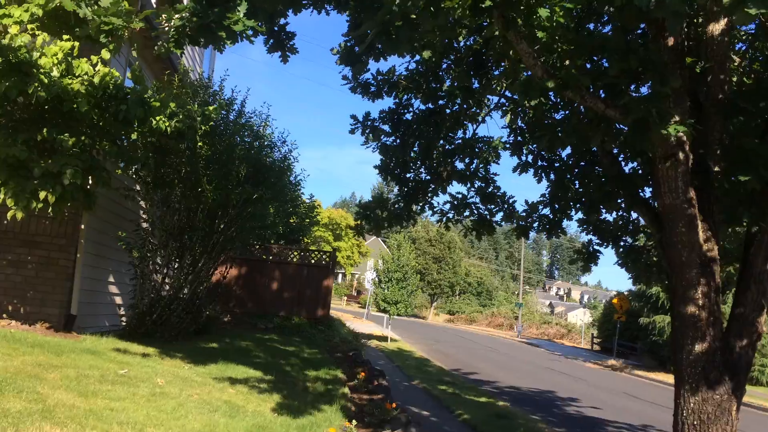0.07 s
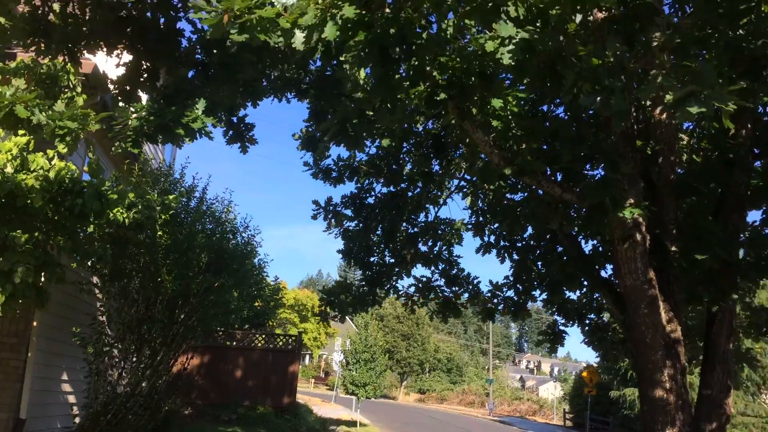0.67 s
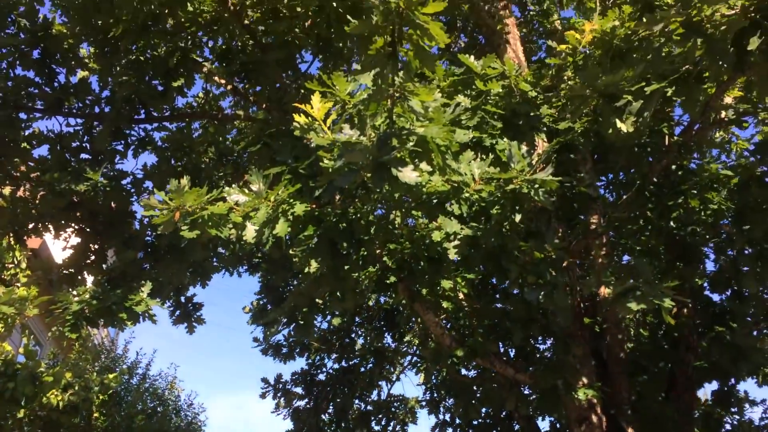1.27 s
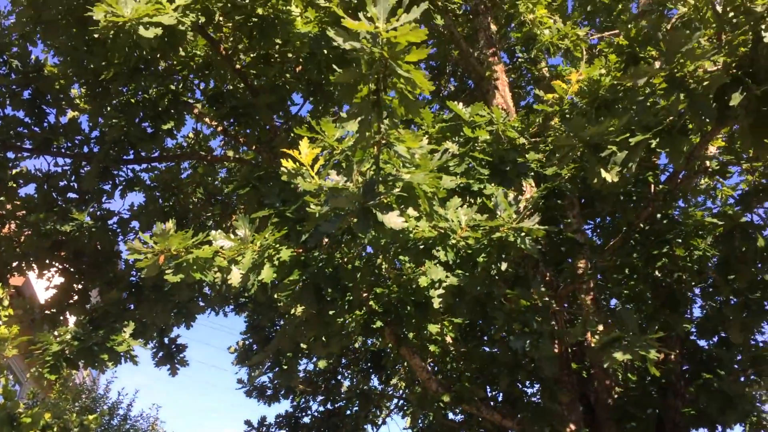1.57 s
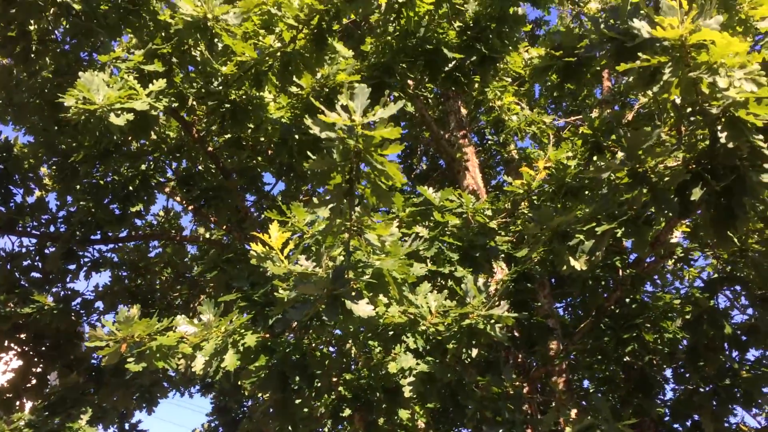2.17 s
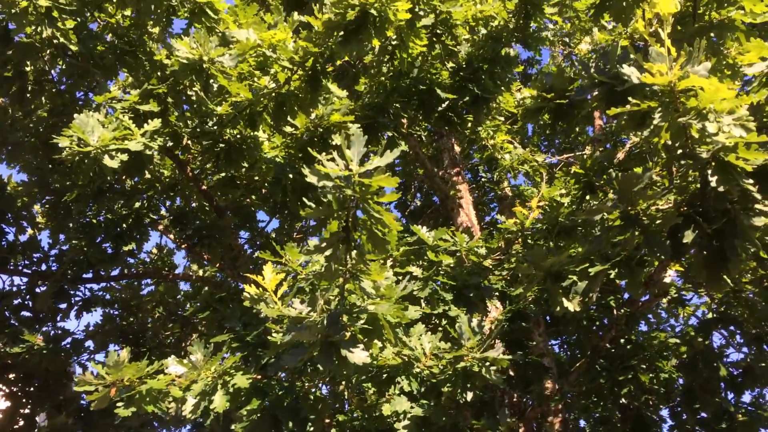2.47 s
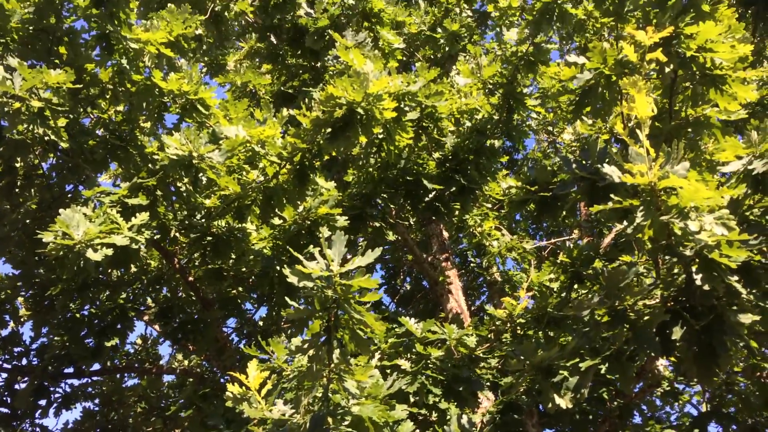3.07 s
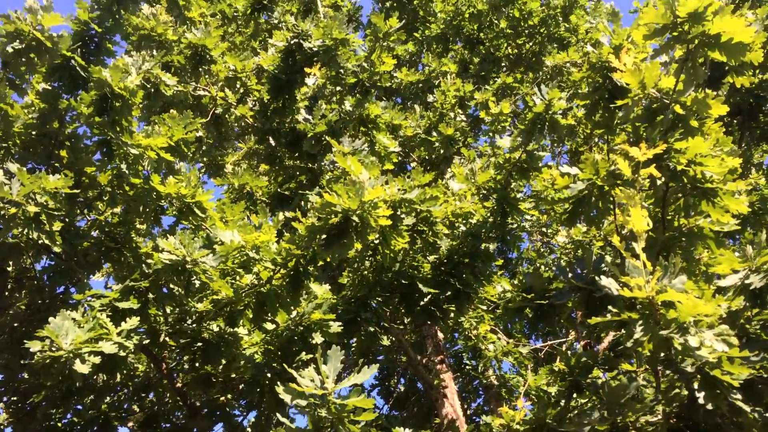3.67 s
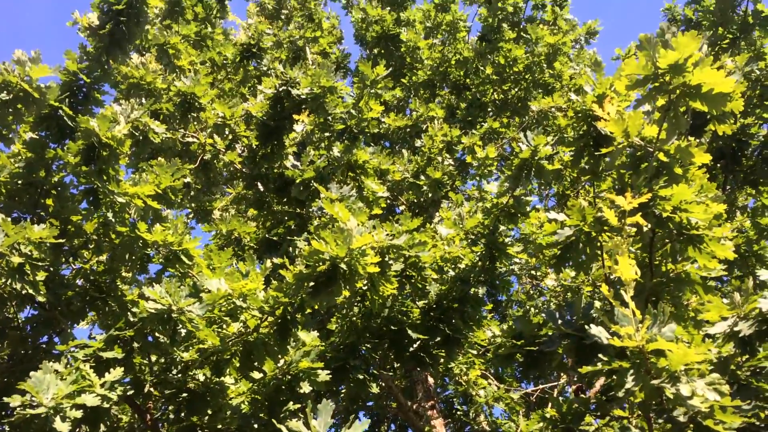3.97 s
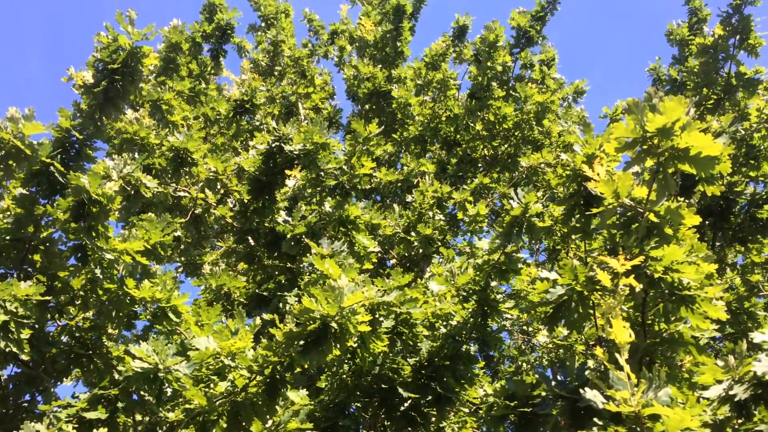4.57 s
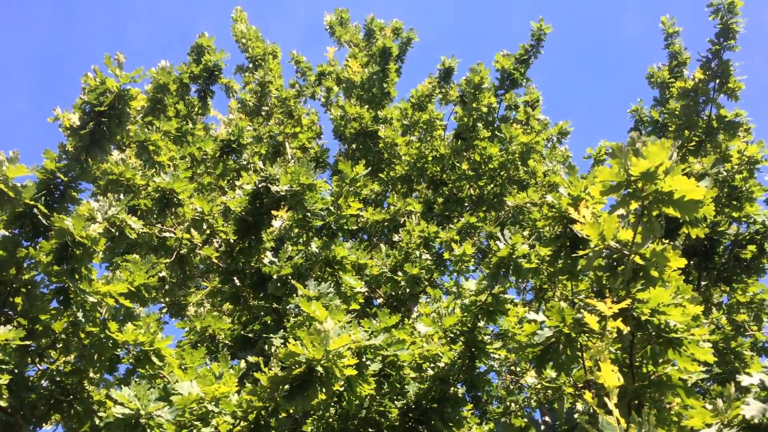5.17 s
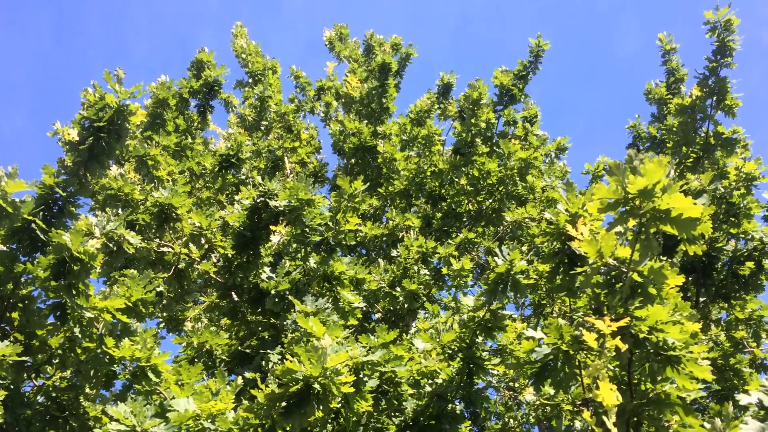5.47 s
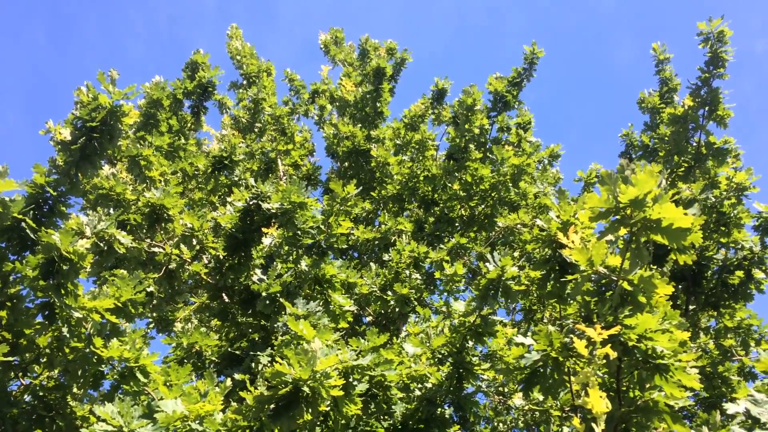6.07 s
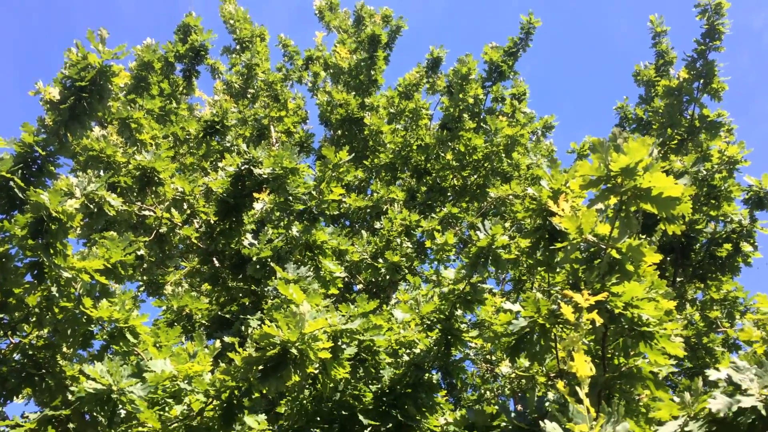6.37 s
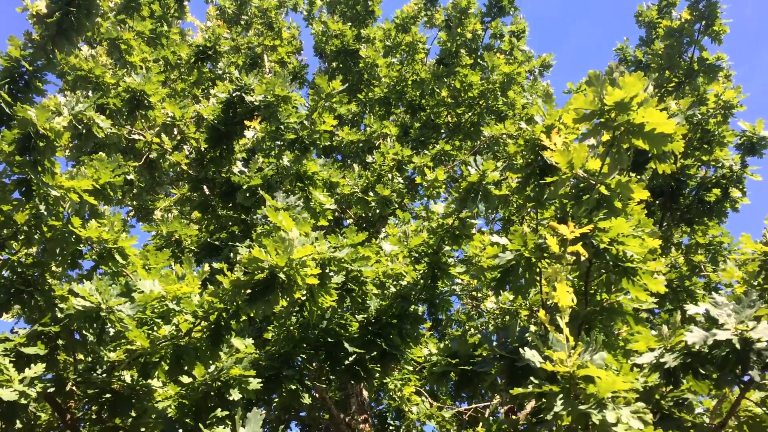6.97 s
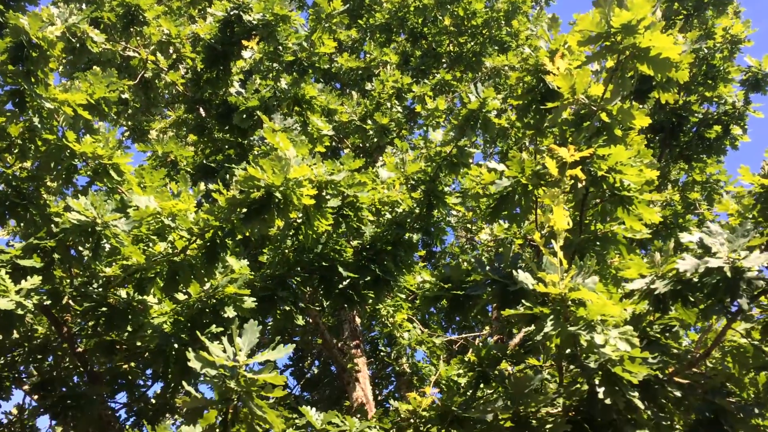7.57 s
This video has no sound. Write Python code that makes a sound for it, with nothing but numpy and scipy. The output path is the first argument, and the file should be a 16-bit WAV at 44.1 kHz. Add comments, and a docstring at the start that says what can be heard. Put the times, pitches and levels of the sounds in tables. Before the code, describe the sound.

A soft, steady hum of many bees fills a tree overhead throughout, over an uneven low rumble and faint outdoor hiss. Light brushes and a tick touch the hand-held microphone at about 1.3 to 1.4 seconds. Distant small birds give faint falling chirps and three high pips between 1 and 2.5 seconds, then a very faint high trill. From about 3.5 to 5.7 seconds one bird whistles a short phrased song with a light echo, clearest at 5 seconds. Two bees pass slightly closer at around 4.4 and 5.1 seconds. Sharp, bassy microphone pops come at 5.3, 6.2 and 6.8 seconds, the last the loudest and with a brief crackle. A thin, faint whine wavers above the hum from about 6 seconds until near the end. Another soft handling brush comes at 7.5 seconds as the bees carry on.

```python
"""A steady hum of bees fills the crown of an oak on a quiet street: many wingbeats merging into one.
Two bees pass closer, and a thin whine wanders above them. Small birds whistle some way off,
echoing from leaves and house fronts, over a low rumble and faint hiss. The hand-held microphone
picks up a few brushes and ticks, and three sharp pops, with a brief crackle around the last."""
import sys
import numpy as np
from scipy import signal
from scipy.fft import rfft, irfft, next_fast_len
from scipy.io import wavfile

SR = 44100
rng = np.random.default_rng(int(sys.argv[2]) if len(sys.argv) > 2 else 0)


def waveform_to_disk(signal):
    """Save audio, clipped to [-1, 1], as 16-bit WAV at the path in sys.argv[1]."""
    frames = np.transpose(np.atleast_2d(signal))
    scaled = np.clip(frames, -1, 1) * 32767
    samples = np.round(scaled).astype(np.int16)
    wavfile.write(sys.argv[1], SR, samples)


N = 344421
TIME = np.arange(N) / SR


def from_db(db):
    """Decibels to gain."""
    return 10 ** (np.asarray(db) / 20)


def rms_one(x):
    """Scale to unit power."""
    return x / np.sqrt(np.mean(x ** 2) + 1e-20)


def in_time(rows):
    """Automation: join breakpoints (time_s, values...) into one curve per value."""
    times, *columns = np.transpose(rows)
    return [np.interp(TIME, times, column) for column in columns]


def coloured(x, points):
    """Zero-phase EQ through (freq_hz, gain_db) points."""
    hz, db = np.transpose(points)
    size = next_fast_len(N + SR // 4)
    log_hz = np.log(np.fft.rfftfreq(size, 1 / SR) + 1e-3)
    gain = from_db(np.interp(log_hz, np.log(hz), db))
    return irfft(rfft(x, size) * gain, size)[:N]


def drift(rate_hz, size=N):
    """Smooth random modulation of spread 1, spanning the scene in size points."""
    control_hz = 500
    pole = np.exp(-2 * np.pi * rate_hz / control_hz)
    slow = signal.lfilter([1], [1, -2 * pole, pole * pole], rng.standard_normal(6000))[2000:]
    return np.interp(np.linspace(0, N / SR * control_hz, size), np.arange(len(slow)), rms_one(slow))


def phase_of(hz):
    """Running phase of a moving pitch."""
    return 2 * np.pi * np.cumsum(hz) / SR


def during(start_s, length_s):
    """Samples of an event, and progress 0-1 through it."""
    at = np.arange(int(start_s * SR), min(N, int((start_s + length_s) * SR)))
    return at, np.linspace(0, 1, len(at))


def elapsed(length_s):
    """Seconds since the start, for every sample of an event."""
    return TIME[:int(length_s * SR)]


def background(lumpy_db=1.8, hiss_db=-67):
    """The street's bed: lumpy low rumble under a smooth hiss."""
    # the rumble's swells and dips: time_s, level_db
    rumble_levels = [(0.2, -57.5), (0.8, -57), (1.1, -63), (1.5, -56.5), (2.6, -57), (4.2, -57), (4.8, -63),
                     (5.22, -56.5), (5.55, -64), (6.0, -62.5), (6.2, -59), (6.4, -61), (6.65, -55),
                     (6.85, -68), (7.35, -56), (7.6, -61), (7.8, -54.5)]
    # the rumble's EQ: freq_hz, gain_db
    rumble_eq = [(20, -42), (40, -15), (65, -1), (82, 1), (120, -6), (180, -11.5), (230, -16), (300, -31),
                 (600, -51.5)]
    # the outdoor hiss's EQ: freq_hz, gain_db
    hiss_eq = [(30, -7.5), (150, 0.5), (370, 1), (600, -3.5), (1000, -4), (1500, -5), (2200, -10),
               (3000, -12), (4500, -15.5), (7000, -17), (10000, -19), (15000, -22)]
    rumble = rms_one(coloured(rng.standard_normal(N), rumble_eq) * from_db(lumpy_db * drift(18)))
    hiss = rms_one(coloured(rng.standard_normal(N), hiss_eq))
    return from_db(in_time(rumble_levels)[0]) * rumble + from_db(hiss_db) * hiss


def brushes_and_crackle():
    """Fast-dying noise bursts: handling brushes and ticks, and a brief crackle around the loudest pop."""
    # the two near 6.75 s are the crackle: start_s, level_db, decay_s, centre_hz, half_width_octaves
    bursts = [(1.312, -58.5, 0.01, 2680, 0.39), (1.323, -66.5, .02, 3300, 0.72),
              (1.339, -66.5, 0.031, 4000, 0.68), (1.4156, -48, 0.0021, 4600, 1.7),
              (6.315, -69.5, 0.019, 2600, 1.2), (6.749, -48, .0004, 3000, 1.6),
              (6.761, -35.5, 0.0011, 4380, 0.92), (7.456, -59.5, 0.014, 4600, 0.29),
              (7.456, -57, 0.019, 1690, 0.67), (7.483, -67, 0.032, 4970, 0.7)]
    out = np.zeros(N)
    for start, db, decay, hz, octaves in bursts:
        at, _ = during(start, .2)
        edges_hz = np.clip([hz / 2 ** octaves, hz * 2 ** octaves], 100, .45 * SR)
        band = signal.butter(2, edges_hz, "band", fs=SR, output="sos")
        noise = signal.sosfilt(band, rng.standard_normal(len(at)))
        out[at] += from_db(db) * rms_one(noise) * np.exp(-TIME[:len(at)] / decay)
    return out


def microphone_pops():
    """A sudden step at the microphone leaks away and swings once below rest."""
    # the steps, ahead of their EQ: start_s, height_db, recovery_s, edge_hz
    steps = [(5.3157, -14.5, 0.0015, 7000), (6.206, -14, 0.0014, 7000), (6.7604, -5.5, 0.0017, 18000)]
    # their bass-heavy EQ: freq_hz, gain_db
    pop_eq = [(20, -13), (45, 7), (65, 9), (100, 5.5), (150, 2.5), (250, -1.5), (370, -1), (480, 4),
              (620, 2.5), (800, 0), (2000, -1), (5000, -.5), (10000, -4.5), (15000, -10)]
    out = np.zeros(N)
    for start, db, recovery, edge_hz in steps:
        at, _ = during(start, .1)
        t = TIME[:len(at)]
        attack = 1 - np.exp(-2 * np.pi * edge_hz * t)
        leak = (1 - t / recovery) * np.exp(-t / recovery)
        out[at] += from_db(db) * attack * leak
    return coloured(out, pop_eq)


def street_echo(x, echo_db, direct_db=-6.5, t60_s=.74, build_s=.013):
    """Leaves and house fronts scatter a sound into a short tail; moving leaves make it flutter."""
    t = elapsed(1)
    tail = rng.standard_normal(SR) * from_db(-60 * t / t60_s) * (1 - np.exp(-t / build_s))
    tail /= np.sqrt(np.sum(tail ** 2))
    flutter = rms_one(from_db(1.5 * drift(45)))
    return from_db(direct_db) * x + from_db(echo_db) * flutter * signal.fftconvolve(x, tail)[:N]


def slide(hz, oct_per_s, length_s):
    """Pitch falling at a steady rate in octaves."""
    return hz * 2 ** (-oct_per_s * elapsed(length_s))


def held(hz, length_s, scoop_oct=.14, scoop_share=.27):
    """Pitch scooping up to a held note over the first part of its length."""
    return hz * 2 ** (-scoop_oct * np.exp(-elapsed(length_s) / (scoop_share * length_s)))


def whistles(syllables, trill_depth, trill_hz=85):
    """Each syllable (start_s, pitch_path_hz, level_db) is a sine whistle with a fast pitch trill."""
    out = np.zeros(N)
    trill = 1 + trill_depth * np.sin(phase_of(trill_hz * (1 + .18 * drift(25))))
    for start, hz, db in syllables:
        at = int(start * SR) + np.arange(len(hz))
        swell = np.abs(np.sin(np.linspace(0, np.pi, len(hz)))) ** .31
        out[at] += from_db(db) * rms_one(swell * np.sin(phase_of(hz * trill[at])))
    return out


def lead_song(rise_oct_per_s=5.2, fall_oct_per_s=5.8, fall_s=.056):
    """The loudest bird's syllables: a lone note, arches that drop to a held note, two downward flicks."""
    # arch and note, ahead of the echo: top_s, rise_s, top_hz, arch_db, note_hz, note_db
    phrases = [(3.835, 0.033, 3200, -67.5, 2260, -63), (4.388, .015, 3490, -63, 2430, -64.5),
               (4.942, .058, 3254, -61, 2217, -54.5), (5.465, .012, 3790, -70, 2835, -62.5)]
    # closing flicks: start_s
    flicks = [5.534, 5.612]
    syllables = [(3.46, held(2490, length_s=.112), -70)]
    for top_s, rise_s, top_hz, arch_db, note_hz, note_db in phrases:
        rise = slide(top_hz, rise_oct_per_s, rise_s)[::-1]
        fall = slide(top_hz, fall_oct_per_s, fall_s)
        syllables.append((top_s - rise_s, np.r_[rise, fall], arch_db))
        syllables.append((top_s + fall_s, held(note_hz, length_s=.049), note_db))
    flick = slide(2560, oct_per_s=14.8, length_s=.025)
    return syllables + [(start, flick, -61.5) for start in flicks]


def birds():
    """One bird carols; others pip, slur and buzz around it. Levels are set ahead of the street's echo."""
    # a second bird's pips, all on one note: start_s, level_db
    pip_cues = [(1.815, -68.5), (2.198, -66.5), (2.502, -65.5)]
    # faint falling slurs farther off: start_s, length_s, start_hz, level_db
    slur_cues = [(1.021, .11, 5650, -75), (1.714, 0.038, 3240, -70.5), (2.122, .088, 5480, -77),
                 (2.178, .041, 3550, -73), (5.186, .08, 4900, -76)]
    pips = [(start, slide(4110, oct_per_s=.6, length_s=.057), db) for start, db in pip_cues]
    slurs = [(start, slide(hz, 4.3, length), db) for start, length, hz, db in slur_cues]
    buzz = [(2.747, slide(5560, oct_per_s=0, length_s=.75), -82)]
    calls = whistles(lead_song(), trill_depth=.019)
    calls += whistles(slurs, trill_depth=.03)
    calls += whistles(buzz, trill_depth=.1)
    return street_echo(calls, echo_db=-6.5) + street_echo(whistles(pips, trill_depth=.008), echo_db=-9.5)


def whine(blur_hz=26, octave_db=-15):
    """A thin, far tone, blurred by its many paths, with a weak octave."""
    # its path above the hum: time_s, pitch_hz, level_db
    path = [(5.3, 985, -83), (6.25, 1000, -76), (6.42, 952, -70), (6.6, 965, -70), (6.8, 1030, -68.5),
            (6.95, 1016, -81), (7.13, 999, -69.5), (7.5, 1004, -75), (7.8, 988, -86)]
    hz, db = in_time(path)
    phase = phase_of(hz)
    tone = drift(blur_hz) * np.sin(phase) + drift(blur_hz) * np.cos(phase)
    tone += from_db(octave_db) * drift(blur_hz) * np.sin(2 * phase)
    return from_db(db) * rms_one(tone)


def near_bees(rolloff_db=11, harmonics=5):
    """A passing bee swells and fades, its fundamental strongest."""
    # close fly-bys: start_s, length_s, start_hz, end_hz, level_db
    fly_bys = [(4.201, 0.435, 287.4, 277.7, -68), (4.919, 0.35, 272.5, 277, -73)]
    out = np.zeros(N)
    waver = 1 + .0033 * drift(8)
    for start, length, start_hz, end_hz, db in fly_bys:
        at, progress = during(start, length)
        phase = phase_of((start_hz + (end_hz - start_hz) * progress) * waver[at])
        tone = sum(from_db(-rolloff_db * k) * np.sin((k + 1) * phase) for k in range(harmonics))
        out[at] += from_db(db) * np.sin(np.pi * progress) * rms_one(tone)
    return out


def swarm(count=56, wingbeat_hz=243, pitch_spread=.057, fade_db=3.04, level_db=-66.5):
    """Each bee repeats one wing stroke at its own wandering rate, and fades as it turns among leaves."""
    # one bee's timbre: harmonic_number, relative_db
    wing_tone = [(1, -4.5), (2, 0.5), (3, -7), (4, -8.5), (5, -8.5), (6, -9.5), (8, -18.5), (12, -23.5),
                 (20, -42)]
    gains = from_db(np.interp(np.arange(1, 21), *np.transpose(wing_tone)))
    stroke_size, block = 4096, 32  # samples per wavetable, and per modulation step
    steps = N // block + 1
    # light and heavy bees: rates lie on a broad, short-tailed bell around the mean
    builds = rms_one(np.arcsin(2 * (np.arange(count) + .5) / count - 1))
    out = np.zeros(N)
    for build in builds:
        harmonics = gains * np.exp(2j * np.pi * rng.random(len(gains)))
        stroke = irfft(np.r_[0, harmonics], stroke_size)
        manoeuvre = .022 * drift(.9, steps) + .004007 * drift(9.11, steps)
        hz = wingbeat_hz * np.exp(pitch_spread * build + manoeuvre)
        advance = np.repeat(hz * stroke_size / SR, block)[:N]
        playhead = np.cumsum(advance).astype(int) % stroke_size
        fade = np.repeat(from_db(fade_db * drift(1.27, steps)), block)[:N]
        out += stroke[playhead] * fade
    return from_db(level_db) * rms_one(out)


def scene():
    """Mono mix: bees overhead, birds far off, small noises at the microphone."""
    bees = swarm() + near_bees()
    return (bees + whine() + birds() + background() + microphone_pops() + brushes_and_crackle())[None]


def record(dry, open_s=.084, cutoff_hz=15400):
    """The microphone opens after a moment; a steep low-pass trims the top."""
    lowpass = signal.firwin(255, cutoff_hz, fs=SR)
    return signal.fftconvolve(dry * (TIME > open_s), lowpass[None], mode="same")


dry = scene()
out = record(dry)
waveform_to_disk(out)
```